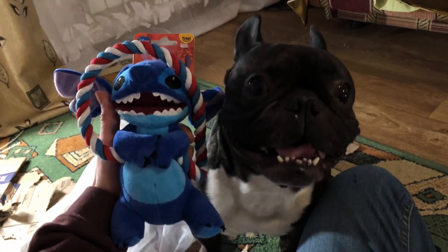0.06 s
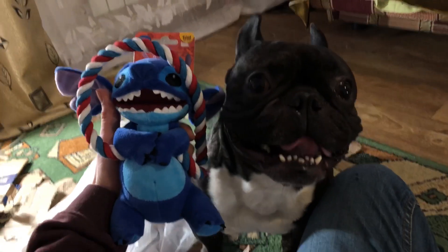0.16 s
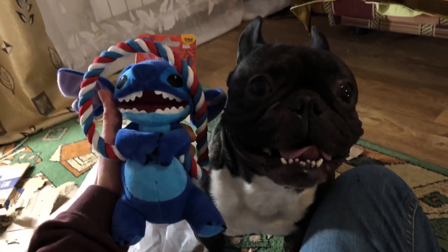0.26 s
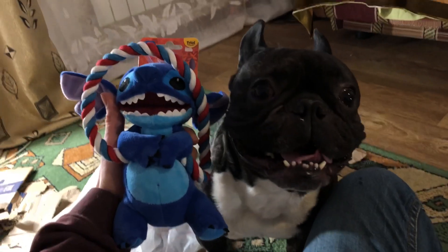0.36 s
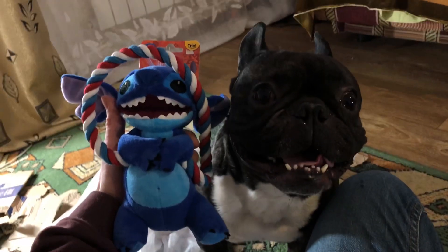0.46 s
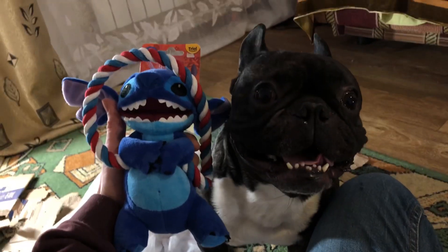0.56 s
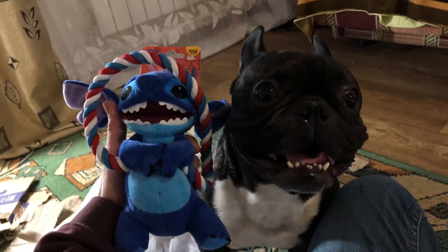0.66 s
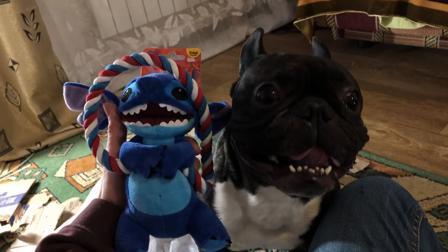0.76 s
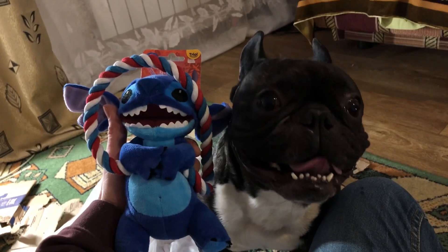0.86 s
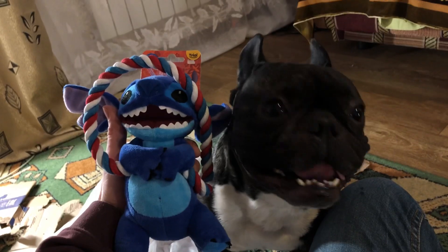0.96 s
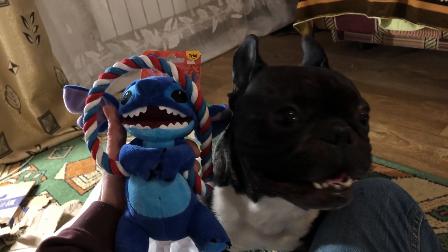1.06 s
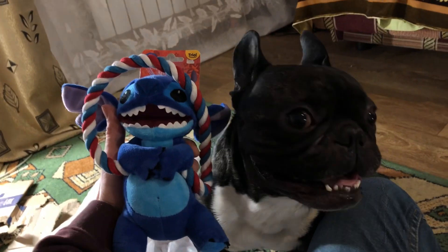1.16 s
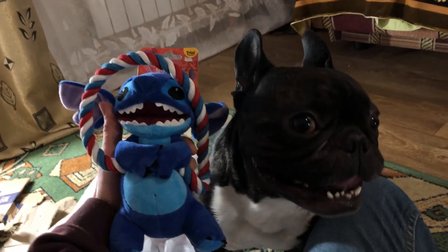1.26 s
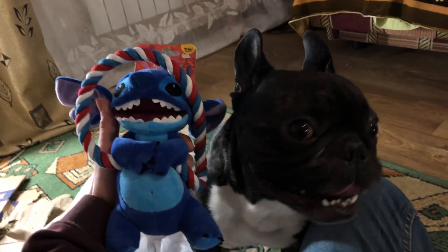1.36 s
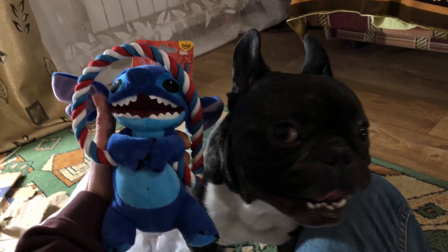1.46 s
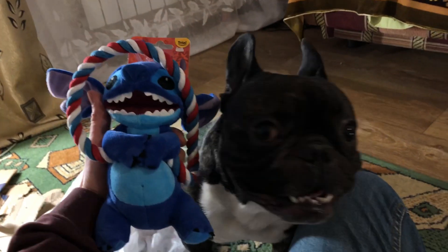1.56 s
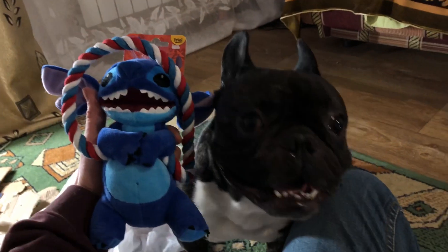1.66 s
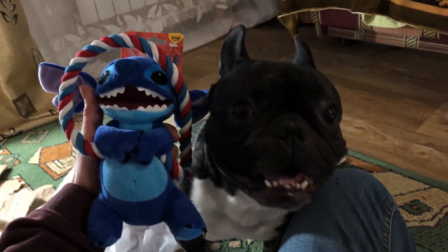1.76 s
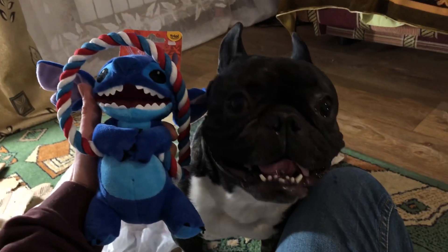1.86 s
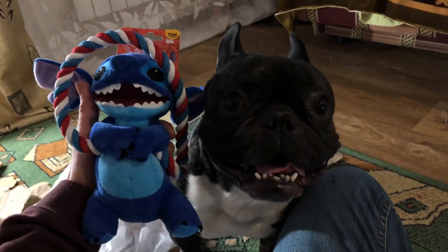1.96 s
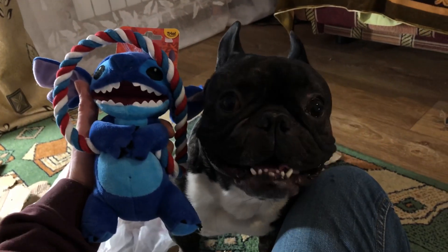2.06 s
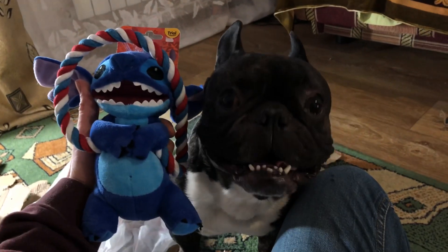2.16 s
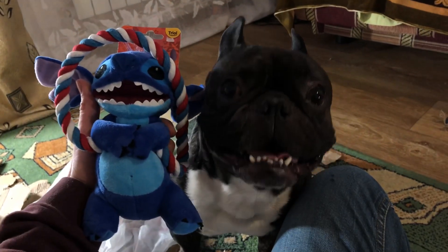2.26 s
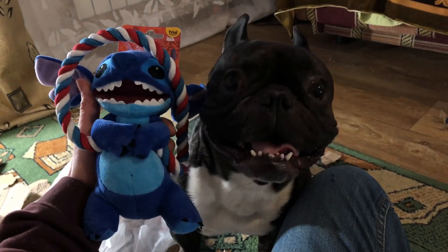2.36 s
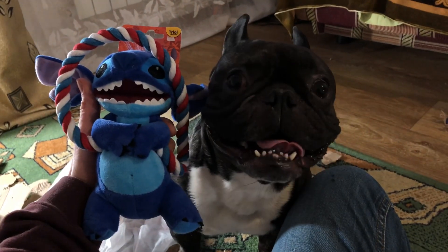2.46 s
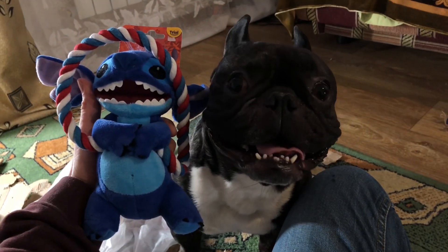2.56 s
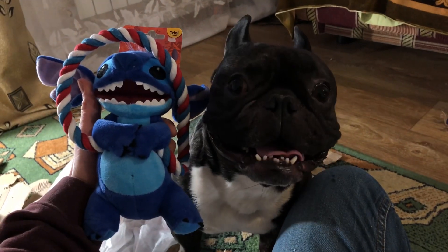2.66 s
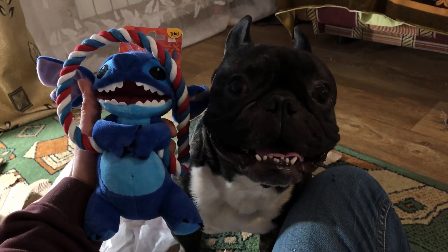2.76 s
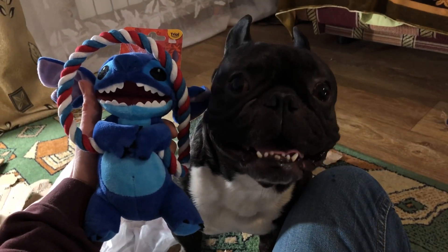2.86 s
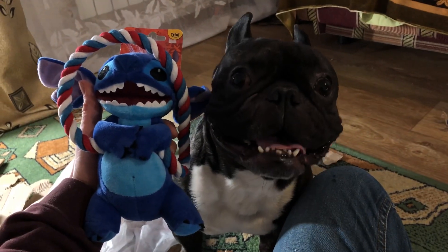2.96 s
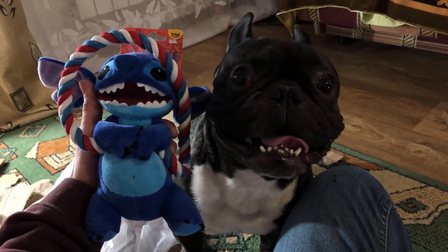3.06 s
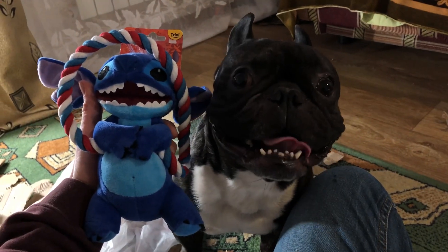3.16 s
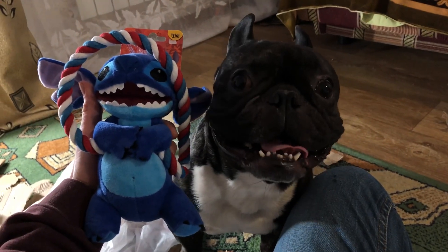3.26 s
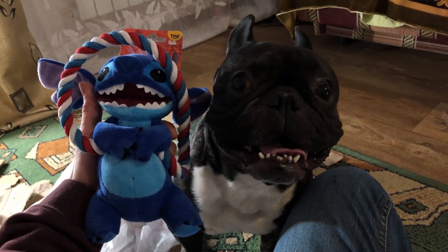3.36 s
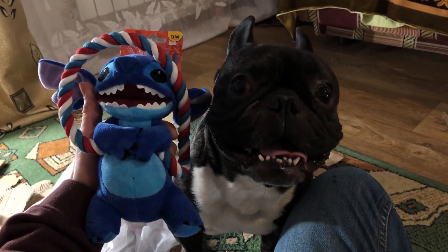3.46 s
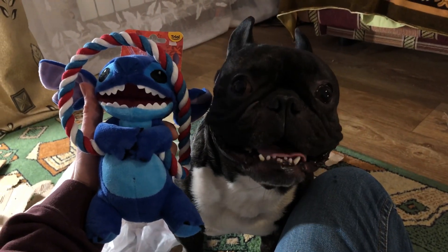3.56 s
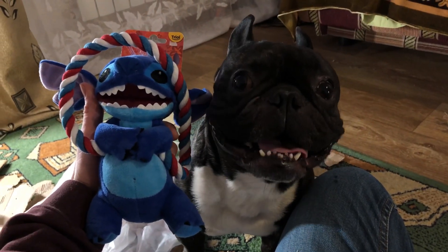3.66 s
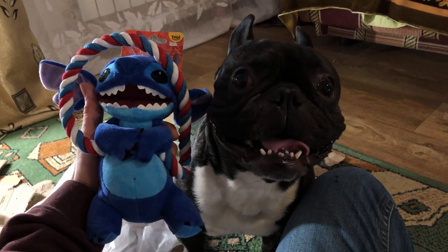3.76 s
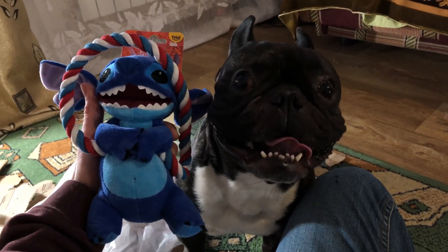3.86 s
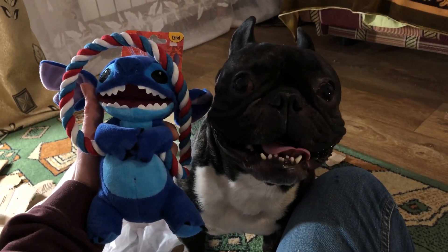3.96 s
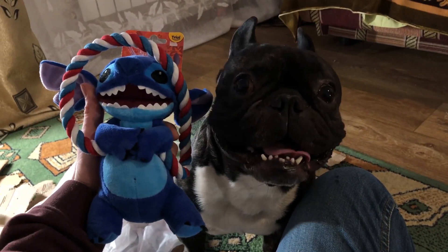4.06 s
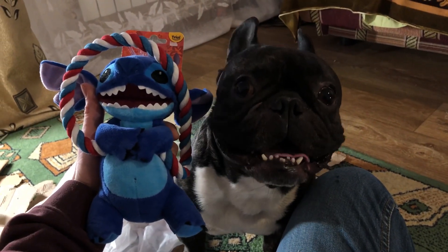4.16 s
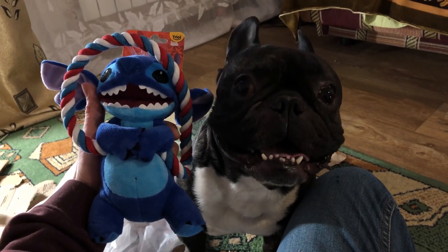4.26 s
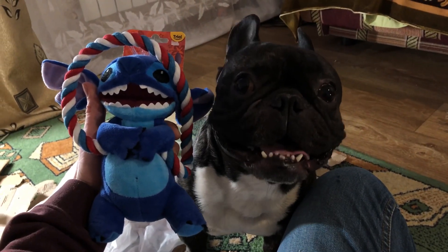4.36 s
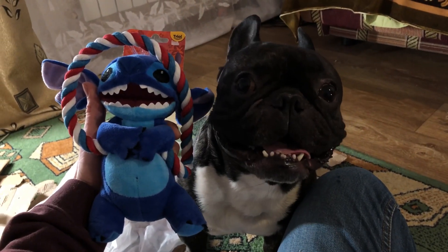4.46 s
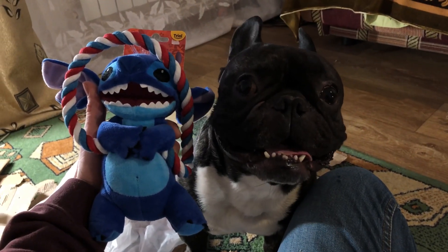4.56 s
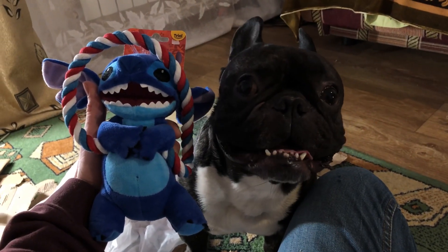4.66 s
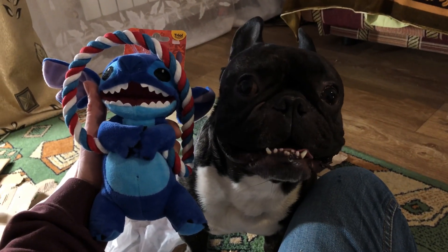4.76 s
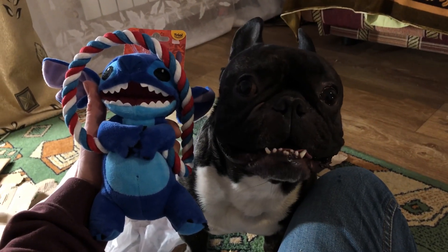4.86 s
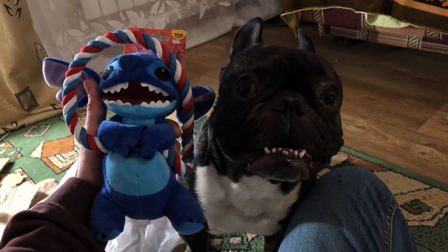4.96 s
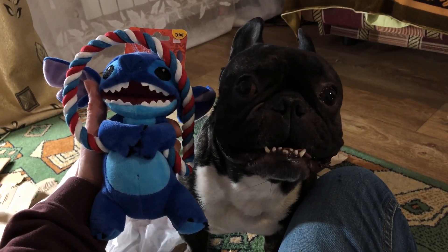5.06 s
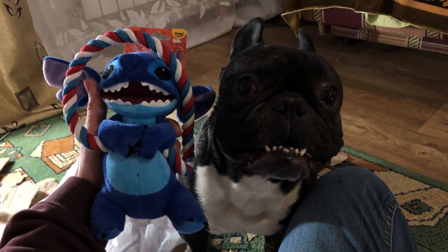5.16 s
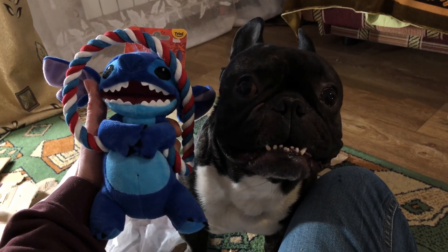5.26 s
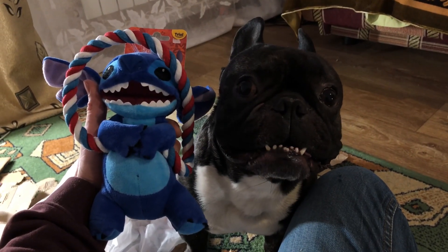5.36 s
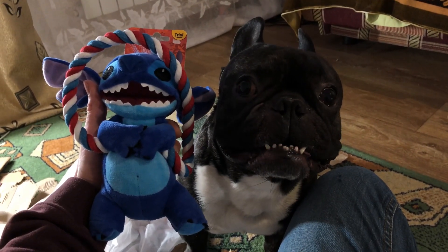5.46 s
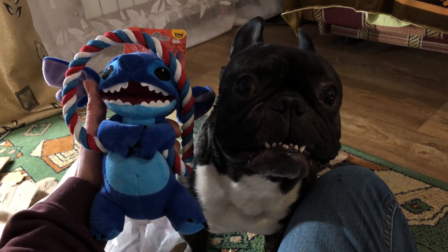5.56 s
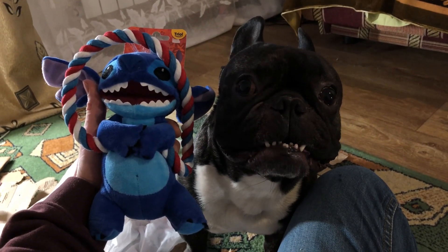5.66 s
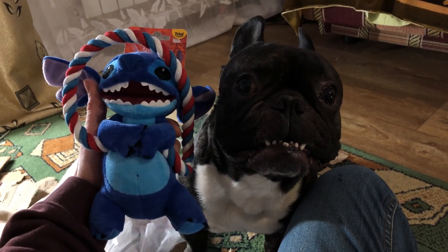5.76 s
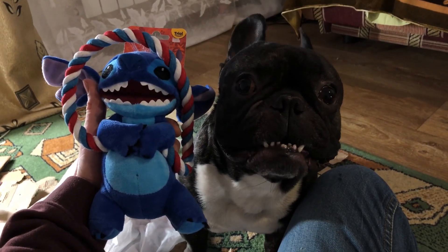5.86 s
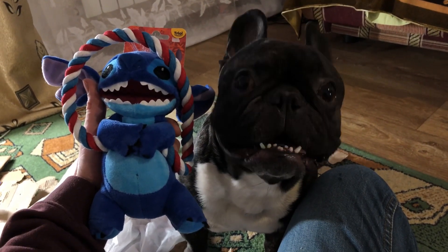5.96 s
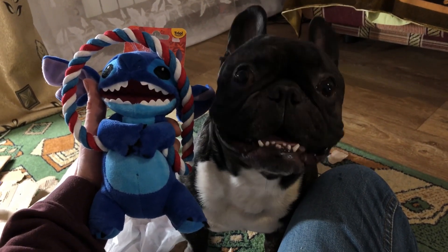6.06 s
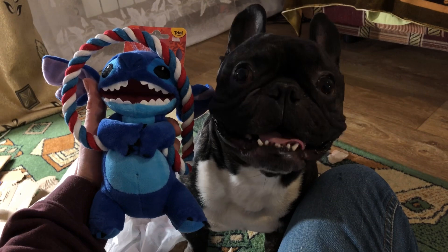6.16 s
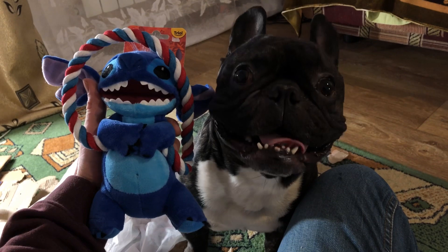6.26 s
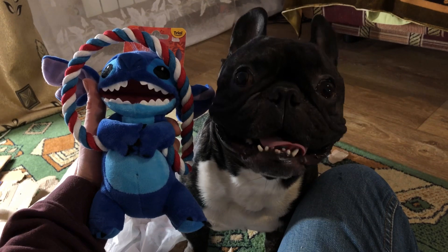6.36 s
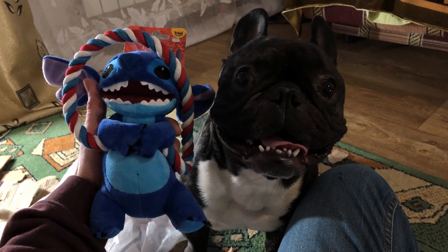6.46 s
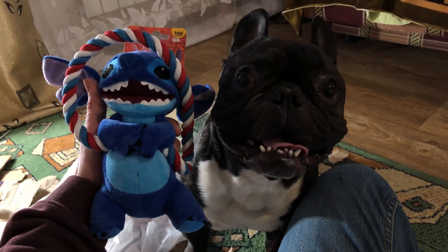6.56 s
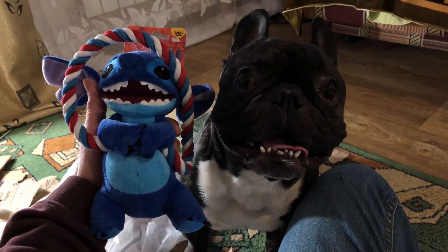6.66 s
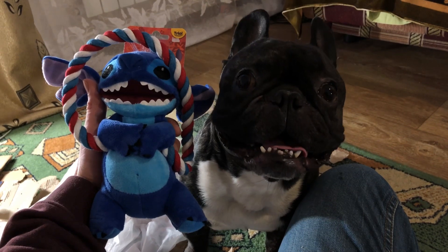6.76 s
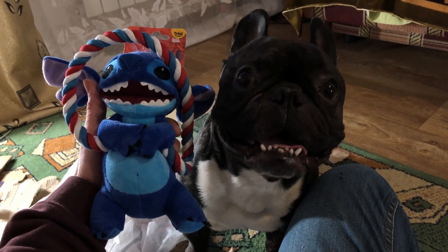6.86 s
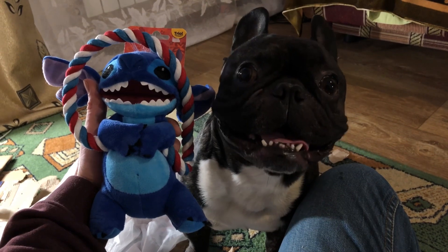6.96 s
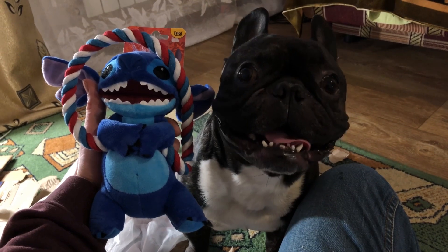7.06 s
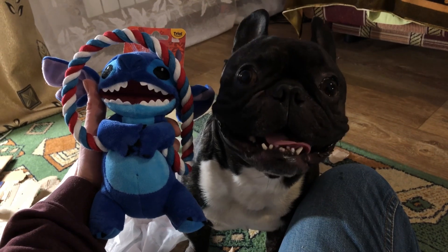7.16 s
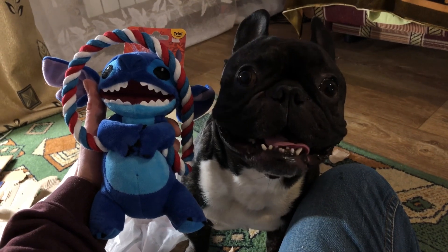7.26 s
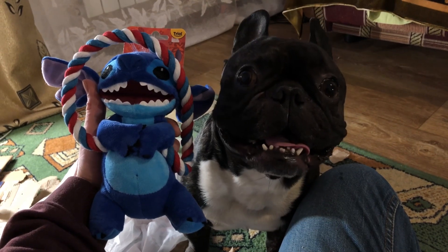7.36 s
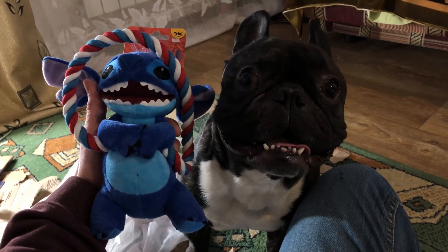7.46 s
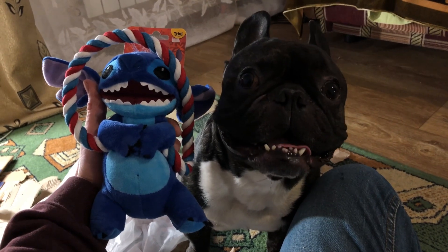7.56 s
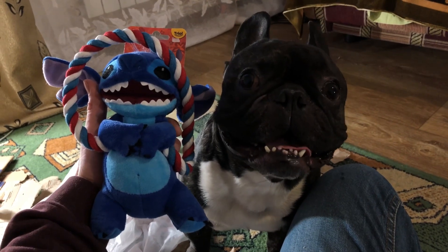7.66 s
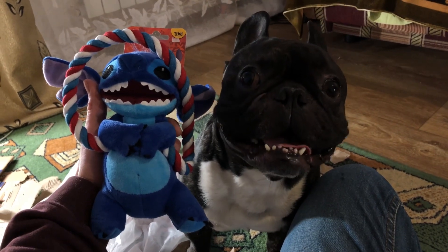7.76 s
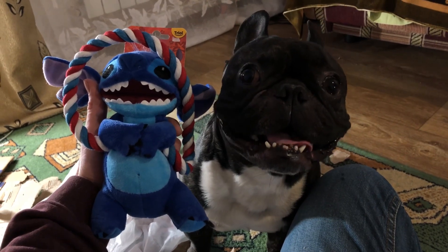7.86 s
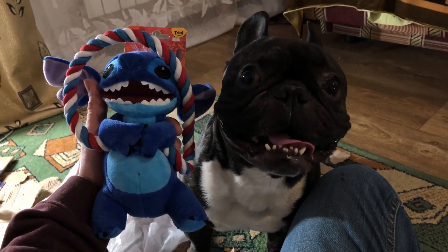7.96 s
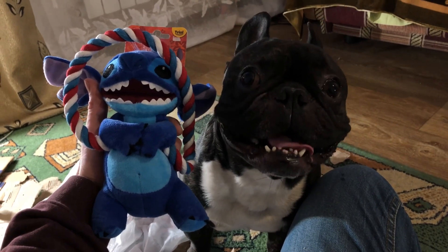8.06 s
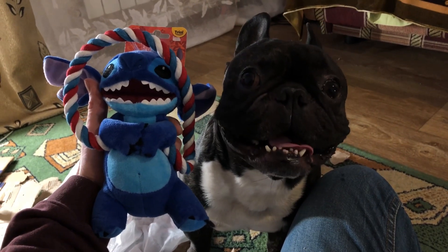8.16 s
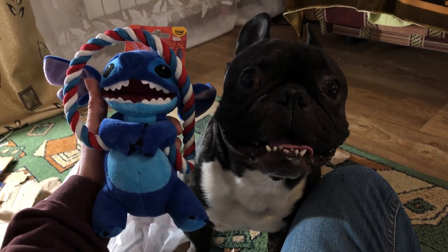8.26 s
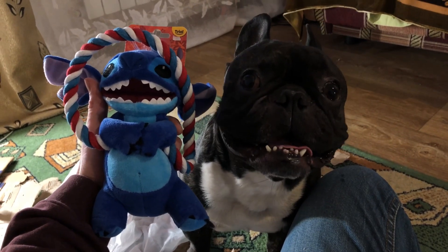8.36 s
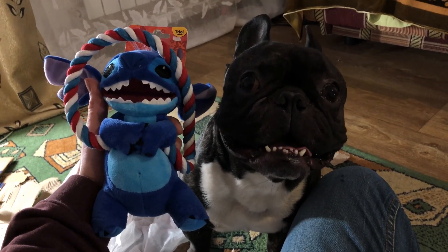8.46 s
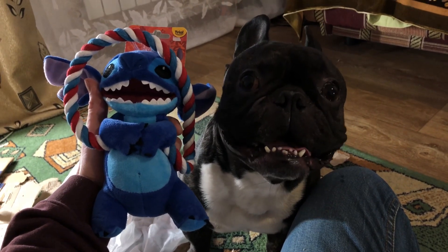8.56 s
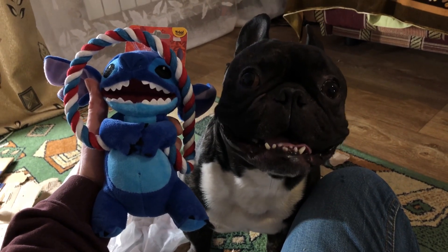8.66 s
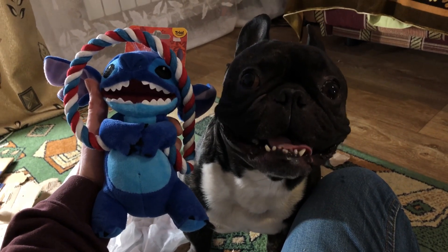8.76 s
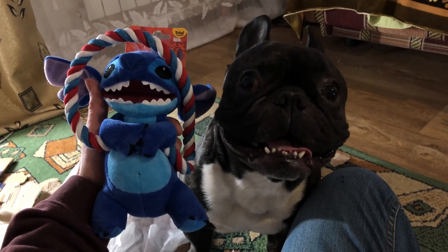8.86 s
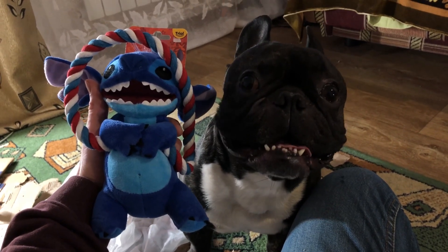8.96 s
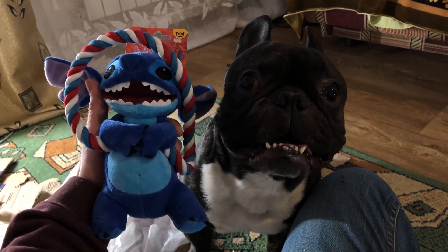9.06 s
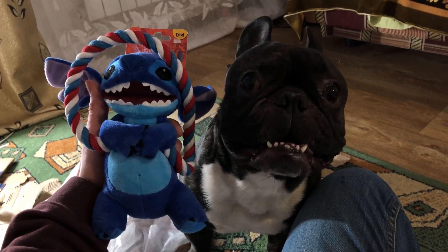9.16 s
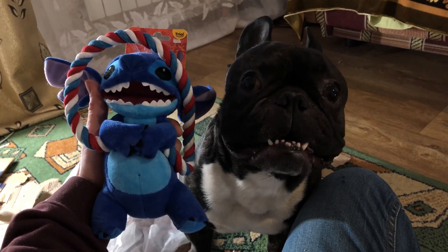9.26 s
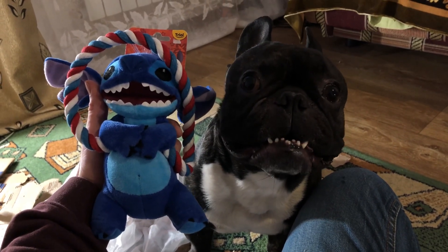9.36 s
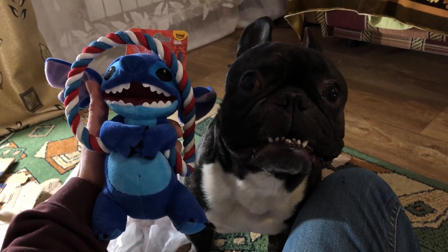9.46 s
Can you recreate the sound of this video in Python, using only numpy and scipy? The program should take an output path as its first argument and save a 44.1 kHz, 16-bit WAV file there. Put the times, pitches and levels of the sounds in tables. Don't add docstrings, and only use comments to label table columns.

```python
import sys
import numpy as np
from scipy import signal
from scipy.fft import rfft, irfft
from scipy.io import wavfile
from scipy.ndimage import uniform_filter1d

SR = 44100
rng = np.random.default_rng(int(sys.argv[2]) if len(sys.argv) > 2 else 0)


def wav_record(signal):
    frames = np.transpose(np.atleast_2d(signal))
    bounded = np.clip(frames, -1, 1)
    quanta = np.round(bounded * 32767).astype(np.int16)
    wavfile.write(sys.argv[1], SR, quanta)


def gain_from_db(level_db):
    decades = np.asarray(level_db, float) / 20
    return 10 ** decades


N = 419832

# (frequency [Hz], width [Hz], level [dB])
CHEST = [(134.6, 46, 6), (95, 35, -4.5), (260, 600, -14), (492, 190, -7)]


def evened(x):
    return x / np.sqrt(np.mean(x ** 2) + 1e-20)


def read(points, hz):
    f, value = np.transpose(points)
    return np.interp(np.log(hz + 1), np.log(f + 1), value)


def add(mix, s, sound):
    part = mix[max(round(s * SR), 0):][:len(sound)]
    part += sound[:len(part)]


def causal(gain):
    cepstrum = irfft(np.log(gain + 1e-5))
    half = len(cepstrum) // 2
    fold = np.r_[1, 2 * np.ones(half - 1), 1, np.zeros(half - 1)]
    return irfft(np.exp(rfft(cepstrum * fold)))[:half]


def tract(modes, spill=((100, -90), (9000, -90))):
    hz = np.fft.rfftfreq(8192, 1 / SR)
    power = gain_from_db(read(spill, hz)) ** 2
    for f, width, db in modes:
        power = power + gain_from_db(db) ** 2 / (1 + (1.93 * (hz - f) / width) ** 2) ** 2
    return causal(np.sqrt(power))


def split(x, hz):
    low = signal.sosfilt(signal.butter(4, hz, fs=SR, output="sos"), x)
    high = signal.sosfilt(signal.butter(4, hz, "high", fs=SR, output="sos"), x)
    return low, high


def turned(modes, s):
    from_s, to_s, lowest_factor, third_factor = 1.09, 1.6, 0.904, 1.053

    def moved(hz):
        if hz < 1400:
            return hz * lowest_factor
        return hz * third_factor if 3000 < hz < 4000 else hz

    return [(moved(hz) if from_s < s < to_s else hz, width, db) for hz, width, db in modes]


def coloured(modes, spill, second_db, third_db, fourth_db, factor, top_db):
    modes = np.array(modes, float) * [factor, 1, 1]
    modes[1:4, 2] += second_db, third_db, fourth_db
    modes[-3:, 2] += top_db
    return [tract(modes * [pose, 1, 1], spill) for pose in (.975, 1.025)]


def flutter(t, marks, per_s, jitter):
    marks = np.r_[t[0] - 1, marks, t[-1] + 1]
    cycles = np.r_[0, np.cumsum(np.maximum(np.round(np.diff(marks) * per_s), 1))]
    between = np.interp(t, marks, np.arange(len(marks)))
    wander = evened(uniform_filter1d(uniform_filter1d(rng.standard_normal(len(t)), 1200), 1200))
    turns = np.interp(t, marks, cycles) + jitter * wander * np.sin(np.pi * between) ** 2
    return np.maximum.accumulate(turns)


def catches(t):
    # (time [s], half length [s], flow change [dB], thump change [dB], fizz change [dB])
    throat_catches = [(0.21, 0.037, 2.5, 0.5, 5.5), (0.74, 0.012, -7, 4, -6.5), (0.871, 0.023, 5, -1, 8.5),
                      (1.15, 0.015, 2.5, -2, 10), (1.239, 0.0045, -8, 7.5, 0), (1.43, 0.026, 6, 4.5, 6),
                      (2.447, 0.019, -3.5, -26, -4), (3.108, 0.012, -9, 10, -5), (3.2, 0.025, -9, 6.5, -4),
                      (3.28, 0.057, 3, 10.5, 4), (3.8, .045, -1, 0, 6), (3.842, 0.017, -4.5, -3, -5),
                      (3.939, 0.016, -7.5, 17, -4), (4.02, 0.053, -3.5, 3, 1), (6.926, 0.0048, 0, -9, 13.5),
                      (7.93, 0.03, 0.5, -5, 6.5), (5.953, 0.029, 2.5, 0, -7), (8.51, 0.0068, -2, -7, 0),
                      (1.5, 0.013, 6, 4, 4), (2.38, 0.013, 7, 6, -3), (0.31, 0.02, 1.5, 2, 0),
                      (5.787, 0.0076, 11, 1, 0), (6.262, 0.0071, -8, 2, -2), (3.16, .015, 1.5, 7.5, -1.5),
                      (1.032, .005, 4, 1, 1), (1.51, 0.0039, 2, 0.5, 0), (7.603, 0.0027, 3, 0.5, -1),
                      (8.467, 0.0043, 0.5, 2.5, 1), (8.493, 0.0047, 1.5, 0, 2.5),
                      (6.798, 0.0084, 2.5, -2, 0), (3.473, .005, 2.5, -0.5, 0), (0.39, .006, 3.5, 0.5, 0.5),
                      (7.652, 0.0043, 0, 0, 0), (2.147, 0.0074, 1, -1, -3), (1.4, .02, 4, 1, 0),
                      (2.8, .02, 1.5, 5, 1)]
    s, half, *changes_db = np.transpose(throat_catches)
    return np.array(changes_db) @ np.exp(-((t - s[:, None]) / half[:, None]) ** 2)


def breath(rows, poses, marks, per_s, jitter, leak, swell, uneven_db, snap, first=0, last=10):
    s, *columns = np.transpose(rows)
    t = np.arange(s[0], s[-1], 1 / SR)
    flow_db, thump_db, fizz_db = np.array([np.interp(t, s, c) for c in columns]) + catches(t)

    turns = flutter(t, marks, per_s, jitter)
    cycle = turns.astype(int)
    overall, middle_luck, top_luck, pose = np.clip(rng.standard_normal((200, 4)), -1.5, 1.5)[cycle].T
    strength = gain_from_db(uneven_db * overall)
    shut = strength * (np.diff(cycle, prepend=cycle[0]) > 0)

    leak = leak * gain_from_db(np.maximum(-61 - flow_db, 0))
    gate = uniform_filter1d(leak + strength * np.exp((turns % 1 - 1) / swell), 110)
    rebound = np.exp(-np.arange(500) / 70)
    gate += .4 * signal.oaconvolve(shut, rebound)[:len(t)]
    gate += snap * signal.oaconvolve(shut, np.hanning(120), "same")
    smooth_air = (t < first - .004) | (t > last + .008)
    gate = np.where(smooth_air, .5, gate)
    gate = gate / uniform_filter1d(gate, 3000)

    air = gate * rng.standard_normal(len(t))
    blend = np.pi / 4 * (1 + np.tanh(uniform_filter1d(pose + 2 * (t > last - .02), 400)))
    hiss = signal.oaconvolve(air * np.cos(blend), poses[0])
    hiss += signal.oaconvolve(air * np.sin(blend), poses[1])
    low, high = split(hiss[:len(t)], 5200)
    bottom, middle = split(low, 1600)
    dull_db = .4 * np.minimum(flow_db + 56, 0)
    low = bottom + middle * gain_from_db(1.5 * uniform_filter1d(middle_luck, 200) + dull_db)

    spray = uniform_filter1d(gate, 350) * gain_from_db(1.9 * uniform_filter1d(top_luck, 200))
    fizz = signal.oaconvolve(spray * rng.standard_normal(len(t)), poses[0])[:len(t)]
    high = high + split(fizz, 5200)[1]

    knocks = evened(uniform_filter1d(shut * gain_from_db(3 * middle_luck), 50))
    knocks += .6 * evened(gate) * rng.standard_normal(len(t))
    thump = signal.oaconvolve(knocks, tract(CHEST))[:len(t)]
    sound = evened(low) + gain_from_db(fizz_db) * evened(high) + gain_from_db(thump_db) * evened(thump)
    return s[0], gain_from_db(flow_db) * sound * signal.windows.tukey(len(t), .07)


def draw(start, attack, length, flow_db, drift_db, thump_db, early_db, late_db, release):
    start_db, end_db, edge_thump_db, edge_fizz_db = -15, -26, 3, 7.5
    end = start + length
    return [(start, flow_db + start_db, thump_db + edge_thump_db, early_db + edge_fizz_db),
            (start + attack, flow_db, thump_db, early_db),
            (end - release, flow_db + drift_db, thump_db, late_db),
            (end, flow_db + drift_db + end_db, thump_db + edge_thump_db, late_db)]


def slap(s, peak_db, puff_db, nose):
    t = np.arange(-.012, .08, 1 / SR)
    gust = np.where(t < 0, np.exp(t / .004), np.exp(-t / .0028)) * rng.standard_normal(len(t))
    puff = signal.oaconvolve(gust, nose)[:len(t)]
    shift = 1 + .12 * rng.uniform(-0.86, 1, 4)[:, None] * [1, 0, 0]
    chest = tract(np.array(CHEST) * shift * [1, .8, 1])
    knock = signal.oaconvolve(np.exp(-(t / 0.00035) ** 2), chest)[:len(t)]
    sound = 1.9 * knock / abs(knock).max() + 0.81 * gain_from_db(puff_db) * puff / abs(puff).max()
    return s + t[0], gain_from_db(peak_db) * sound


def rattle(first, last, per_s, peak_db, puff_db):
    s = np.linspace(first, last, round((last - first) * per_s) + 1)
    chance = np.clip(rng.standard_normal((20, 3)), -1.5, 1.5)[:len(s)].T
    uneven_db = 8.5 * chance[0]
    late_s = .002 * chance[1]
    return list(zip(s + late_s, peak_db + uneven_db, puff_db - 0.3 * uneven_db + 2.8 * chance[2]))


def draws_in():
    # (start [s], attack [s], length [s], air flow [dB], drift of flow over the hold [dB])
    draw_events = [(0, 0.0033, 0.37, -43, -4), (0.555, 0.09, 0.4, -46, 2.5),
                   (1.102, 0.095, 0.23, -45.5, -5.5), (1.324, 0.0063, 0.16, -47.5, -3.5),
                   (1.66, 0.092, 0.38, -47.5, -2), (2.266, 0.028, 0.42, -50, -1.5),
                   (2.933, 0.075, .47, -49, 1.5), (3.635, 0.1, 0.48, -44.5, -8),
                   (5.722, .068, 0.17, -72.5, -2), (6.041, 0.12, 0.66, -53.5, -2.5),
                   (6.892, 0.13, 0.49, -53.5, -6), (7.328, 0.017, 0.28, -68.5, 2),
                   (7.784, 0.07, 0.22, -57.5, 5.5), (7.972, 0.018, 0.46, -57, -14.5),
                   (8.669, 0.025, .2, -57.5, -10.5)]
    # (thump re flow [dB], early fizz re flow [dB], late fizz re flow [dB], release [s])
    draw_efforts = [(-7.5, -22.5, -12.5, 0.05), (-5, -18, -15.5, 0.09), (-0.5, -20, -17.5, 0.015),
                    (-1.5, -18.5, -16.5, 0.022), (-9.5, -22.5, -12, 0.057), (-6, -20.5, -13, 0.031),
                    (-10, -19.5, -11, 0.011), (-6, -21.5, -11.5, 0.064), (-11, -23, -3, 0.047),
                    (-14.5, -19, -15.5, 0.082), (-9, -17, -18.5, 0.13), (-11, -46, -30.5, .015),
                    (-8.5, -15, -19.5, .03), (-7.5, -15.5, -21, 0.025), (-6, -19, -20, 0.036)]
    # (2nd, 3rd, 4th resonance [dB], tract factor [1], top resonances [dB])
    draw_colours = [(0.5, 3.5, 3, 0.982, 4.5), (1, 3, 3.5, 0.984, 0), (1, 5.1, -2, 1.003, -3),
                    (0.5, 9.2, -3.5, 0.984, 2), (1.5, 3.2, -1, 1.013, -1), (1.5, 4, 1, 1.008, 1.5),
                    (1, 3.8, 1, 1, 1), (.5, 4.2, 1.5, 0.998, 1.5), (-16.5, 3.5, 3, 0.85, .1),
                    (0.5, 2, -2.5, 1.012, -14.5), (0.5, 2.4, -0.5, 1.008, 2), (-3.5, 2, -5, 1, .1),
                    (1.5, 5.7, -1, 1.008, 3), (-1.5, 2.6, -4.5, 1.013, -2), (2, 4.7, 3.5, 1.036, 16)]
    # (time [s], thump peak [dB], puff re thump [dB])
    single_slaps = [(.033, -60, 13), (.084, -38.5, 6.5), (.115, -41.5, 10.5), (.183, -39.5, 2.5),
                    (.207, -36.5, 3), (.287, -38.5, -6), (.603, -65.5, 25.5), (.667, -40, 6),
                    (.692, -33, -22.5), (.714, -49.5, 22), (.837, -51.5, 18), (.868, -34, 3.5),
                    (1.138, -52.5, 12), (1.201, -45, 12), (1.34, -44, 15), (1.412, -47.5, -3),
                    (1.753, -60.5, 20.5), (1.791, -48.5, 15.5), (1.829, -69.5, 27.5), (1.898, -52.5, 20.5),
                    (1.962, -54.5, 23), (2.28, -65, 10.5), (3.035, -42.5, -1.5), (3.783, -41, 7),
                    (3.232, -57, 2), (3.258, -37.5, 1), (3.294, -47, 7), (3.33, -51.5, 8),
                    (3.354, -41, -2.5), (6.056, -61.5, 20.5), (6.192, -65, 18), (6.216, -47.5, 11),
                    (6.251, -60, 22), (6.283, -56, 15), (6.315, -50, 15.5), (6.35, -49.5, 14),
                    (6.383, -52, 12), (6.417, -47.5, 10.5), (6.449, -54.5, 14.5), (6.481, -54, 16),
                    (6.511, -45.5, 9.5), (6.593, -59, 17), (6.924, -59, 14.5), (7.141, -46.5, 9.5),
                    (7.16, -72, 29.5), (7.843, -57, 8), (3.016, -57.5, 16.5), (3.06, -42, 3.5),
                    (3.161, -57.5, 17.5), (7.864, -65, 23), (7.886, -72, 20.5), (7.931, -67, 21),
                    (7.948, -60, 19), (1.162, -55, 16), (2.326, -61, 18), (2.362, -59, 10),
                    (2.619, -62, 19), (3.728, -58, 17), (3.812, -58, 16), (8.052, -68, 22)]
    # (first [s], last [s], rate [1/s], thump peak [dB], puff re thump [dB])
    slap_runs = [
        (2.39, 2.561, 30.5, -56, 13.5),
        (8.697, 8.791, 45, -71.5, 26.5),
    ]
    # (frequency [Hz], width [Hz], level [dB])
    nose_in = [(1309, 220, 0), (2316, 293, -1), (3525, 440, -16), (4430, 400, -10.5), (1522, 340, -8.5),
               (5515, 240, -24.5), (6446, 320, -20.5), (8940, 600, -28.5), (11400, 800, -31),
               (13700, 800, -32.5)]
    # (frequency [Hz], level [dB])
    spill_in = [(300, -21), (900, -12.5), (2000, -14), (2900, -34.5), (4000, -28), (5600, -37),
                (15000, -40.5)]

    mix = np.zeros(N)
    every_slap = sorted(single_slaps + sum((rattle(*row) for row in slap_runs), []))
    for event, effort, colour in zip(draw_events, draw_efforts, draw_colours):
        nose = coloured(turned(nose_in, event[0]), spill_in, *colour)
        rows = draw(*event, *effort)
        slaps = [row for row in every_slap if rows[0][0] < row[0] < rows[-1][0]]
        marks = [row[0] + 0.0026 for row in slaps]
        add(mix, *breath(rows, nose, marks, per_s=42, jitter=.3, leak=.38, swell=.4, uneven_db=2.4, snap=.5))
        for row in slaps:
            add(mix, *slap(*row, nose[0]))
    return mix


def hush():
    # (frequency [Hz], level [dB per Hz])
    hush_colour = [(15, -51), (25, -15.5), (161, -14.5), (195, -7), (263, -22), (317, -19.5), (503, -21),
                   (560, -22), (818, -28), (16000, -43)]
    # (frequency [Hz], level [dB])
    hum_tones = [(232, -80), (69, -60.5), (138, -65)]
    # (time [s], level [dB])
    engine_level = [
        (4.55, -5.5),
        (4.7, -19),
        (5.9, -16),
        (8.95, -11.5),
        (9.2, -7.5),
        (9.52, -5.5),
    ]

    t, hz = np.arange(N) / SR, np.fft.rfftfreq(N, 1 / SR)
    waver = evened(uniform_filter1d(rng.standard_normal(N), 6000))
    tones = []
    for f, db in hum_tones:
        phase = 2 * np.pi * np.cumsum(f * (1 + 0.03 * waver)) / SR
        tones.append(gain_from_db(db + 1.78 * waver) * np.sin(phase))
    hum, *engine = tones
    engine = sum(engine) * gain_from_db(np.interp(t, *np.transpose(engine_level)))
    hiss = irfft(rfft(rng.standard_normal(N)) * gain_from_db(read(hush_colour, hz)), N)
    return gain_from_db(-71) * evened(hiss) + hum + engine


def snort(start, first, last, flow_db, drift_db, thump_db, fizz_db, release):
    burst_s = 0.019
    burst_db = -5 - 130 * (first - start - burst_s)
    full = first + 0.023
    go = max(last - 0.024, full + .004)
    late_db = flow_db + drift_db
    end, end_db = last + release, late_db - 23.5
    burst_thump_db, burst_fizz_db = thump_db - 1, fizz_db - 1.5
    end_thump_db, end_fizz_db = thump_db + 11, fizz_db + 2
    return [(start, flow_db - 30.5, burst_thump_db, burst_fizz_db),
            (start + burst_s, flow_db + burst_db, burst_thump_db, burst_fizz_db),
            (full, flow_db, thump_db, fizz_db - 0.75),
            ((full + go) / 2, flow_db + drift_db / 2 + 1, thump_db, fizz_db),
            (go, late_db, thump_db, fizz_db),
            (last + 0.52 * release, late_db - 7.5, thump_db, end_fizz_db),
            (end, end_db, end_thump_db, end_fizz_db),
            (end + 0.048, end_db - 12.5, end_thump_db, end_fizz_db)]


def nostril_pop(peak_db, nose):
    decay_s = 0.0012
    click = np.exp(-np.arange(0, .02, 1 / SR) / decay_s) * rng.standard_normal(SR // 50)
    pop = signal.oaconvolve(click, nose)
    pop = split(pop, 5000)[0] + gain_from_db(-12) * pop
    return gain_from_db(peak_db) * pop / abs(pop).max()


def snorts_out():
    # (start [s], first flap [s], last flap [s], flap rate [1/s], air flow [dB])
    snort_events = [(0.355, 0.368, .512, 55, -32.5), (0.913, 0.926, 1.032, 47, -34),
                    (1.478, 1.489, 1.606, 54, -34), (2.024, 2.036, 2.165, 48.7, -36),
                    (2.69, 2.696, 2.842, 50, -36.5), (3.401, 3.41, 3.543, 56, -34.5),
                    (4.085, 4.1, 4.224, 52, -34), (5.845, 5.919, 5.979, 31, -39),
                    (6.672, 6.684, 6.841, 43.4, -39), (7.552, 7.567, 7.672, 50.4, -39.5),
                    (8.388, 8.418, 8.538, 46.4, -36.5)]
    # (drift of flow [dB], chest thump re flow [dB], fizz re flow [dB], release [s])
    snort_efforts = [(-2, -7.5, -10.5, 0.04), (0, -9.5, -11, 0.046), (-0.5, -8, -12.5, 0.039),
                     (0.5, -7.5, -9.5, 0.04), (-0.5, -9.5, -9, 0.028), (-3, -6.5, -9.5, 0.045),
                     (-3.5, -9.5, -11.5, 0.052), (0, -19.5, -6, 0.034), (-0.5, -8.5, -9, 0.03),
                     (1.5, -6, -7.5, 0.071), (-3, -8.5, -8.5, 0.031)]
    # (2nd, 3rd, 4th resonance [dB], tract factor [1], top resonances [dB])
    snort_colours = [(-22.5, -0.5, -2.5, 1, -4.5), (6, 4.5, 2, 0.99, -0.5), (8, 4.5, 5.5, 0.99, 2),
                     (1, 2, -2, 1.008, -4), (2, 1.5, -1, 0.998, 1), (5, 2, -3, 0.995, -2.5),
                     (-4, -0.5, -0.5, 0.982, 1.5), (-19.5, -6, -13, 0.988, -2), (-2, -0.5, -5, 0.99, 0.5),
                     (5, 2.5, -2, 0.99, 1), (-10.5, -1.5, 0.5, 0.988, 1)]
    # (flap where the rate changes [s], leak past the palate [1], nostril pop peak [dB])
    snort_paces = [(.468, 0.31, -39.5), (.989, .22, -34.5), (1.552, 0.36, -33.5), (2.11, 0.26, -48.5),
                   (2.764, 0.32, -49), (3.473, 0.5, -46), (4.156, 0.27, -33), (5.944, 0.82, -60),
                   (6.77, 0.38, -34), (7.603, 0.23, -38), (8.493, 0.23, -36)]
    # (frequency [Hz], width [Hz], level [dB])
    nose_out = [(1478, 196, -0.5), (2350, 620, -15.5), (3555, 440, -12.5), (6430, 670, -20.5),
                (1283, 170, -5.5), (4700, 200, -15), (9280, 1600, -21.5), (11600, 700, -27),
                (13200, 750, -31.5)]
    # (frequency [Hz], level [dB])
    spill_out = [(300, -18), (900, -14.5), (2300, -14), (5000, -24), (7600, -29), (15000, -36.5)]

    mix = np.zeros(N)
    for event, effort, colour, pace in zip(snort_events, snort_efforts, snort_colours, snort_paces):
        start, first, last, per_s, flow_db = event
        change, leak, pop_db = pace
        nose = coloured(turned(nose_out, start), spill_out, *colour)
        rows = snort(start, first, last, flow_db, *effort)
        add(mix, *breath(rows, nose, [first, change, last], per_s, jitter=.05, leak=leak, swell=.36,
                         uneven_db=1.0, snap=.55, first=first, last=last))
        add(mix, first - .003, nostril_pop(pop_db, nose[1]))
    return mix


def blotchy(x):
    hz, _, z = signal.stft(x, SR, nperseg=256)
    noise = rng.standard_normal(z.T.shape)
    patches = evened(uniform_filter1d(uniform_filter1d(noise, size=6, axis=0), size=4, axis=1)).T
    patch_db = 1.7 * patches * (hz[:, None] > 1900) - 1
    return signal.istft(z * gain_from_db(patch_db), SR, nperseg=256)[1][:N]


def whines():
    # (start [s], length [s], level [dB], first pitch [Hz], last pitch [Hz])
    whine_events = [
        (4.64, 0.17, -77, 592, 488),
        (5.248, 0.097, -73.5, 395, 430),
        (5.351, .11, -71.5, 411, 354),
    ]
    mix = np.zeros(N)
    for s, length, db, first_hz, last_hz in whine_events:
        u = np.arange(0, 1, 1 / (SR * length))
        waver = evened(uniform_filter1d(rng.standard_normal(len(u)), 500))
        hz = first_hz + (last_hz - first_hz) * u + 14 * waver
        swell = gain_from_db(db + 4.5 - 13 * abs(2 * u - 1))
        add(mix, s, swell * np.sin(2 * np.pi * np.cumsum(hz) / SR))
    return mix


def thuds():
    # (time [s], peak [dB], pitch [Hz])
    floor_thuds = [
        (5.25, -60, 59.8),
        (5.498, -52.5, 60.56),
        (7.363, -57, 63),
        (7.499, -52, 62.7),
    ]
    mix, t = np.zeros(N), np.arange(-.05, .05, 1 / SR)
    for s, db, hz in floor_thuds:
        add(mix, s + t[0], gain_from_db(db) * np.exp(-(t / 0.019) ** 2) * np.cos(2 * np.pi * hz * t))
    return mix


def wet_tick():
    # (time [s], peak [dB])
    lip_ticks = [
        (5.8267, -40),
    ]
    mix = np.zeros(N)
    for s, db in lip_ticks:
        tick = np.exp(-np.arange(200) / 30.0) * rng.standard_normal(200)
        add(mix, s, gain_from_db(db) * (split(tick, 8450)[1] + gain_from_db(-7) * split(tick, 1100)[1]))
    return mix


def dog():
    return blotchy(draws_in() + snorts_out()) + whines() + wet_tick()


def room(x, decays):
    taps = np.zeros(SR)
    at = np.arange(250, len(taps) - 20, 20)
    taps[at + rng.integers(0, 20, len(at))] = rng.choice([-1., 1.], len(at))
    hz, t, z = signal.stft(taps, SR, nperseg=256)
    tail = signal.istft(z * gain_from_db(-60 * t / read(decays, hz)[:, None]), SR, nperseg=256)[1]
    return signal.fftconvolve(x, tail / np.linalg.norm(tail))[:N]


def scene():
    # (frequency [Hz], t60 [s])
    room_decay = [(100, .5), (1500, .85), (3200, .8), (8000, .3)]
    # (frequency [Hz], t60 [s])
    corner_decay = [(100, .2), (9000, .17)]
    # (frequency [Hz], width [Hz], level [dB])
    furniture = [(1550, 170, 6), (3070, 280, 12)]

    near = split(dog(), 56)[1]
    ringing = tract(furniture, [(1000, 5.0), (4000, -4), (9000, -8.5)])
    echo = signal.oaconvolve(room(near, room_decay), ringing)[:N]
    early = gain_from_db(-17) * room(near, corner_decay)
    return (near + early + gain_from_db(-30.0) * echo + thuds() + hush())[None]


def band_limit(x):
    return signal.sosfilt(signal.butter(12, 16470, fs=SR, output="sos"), x)


def record(dry):
    edge = signal.firwin(511, 16100, window=("kaiser", 9), fs=SR)
    mix = signal.oaconvolve(dry, edge[None], "same")
    return band_limit(mix)


dry = scene()
out = record(dry)
wav_record(out)
```